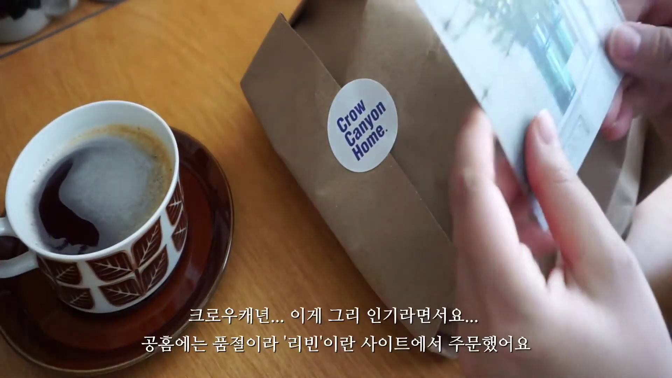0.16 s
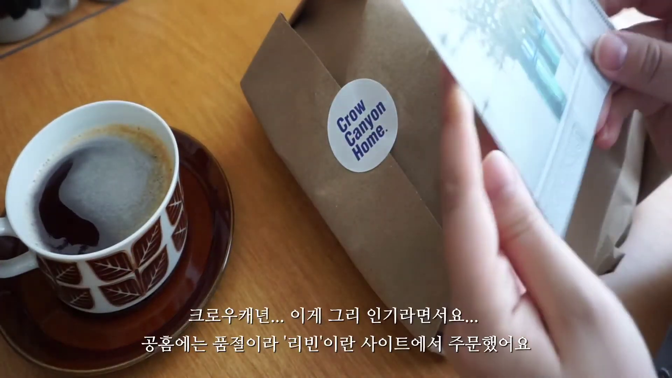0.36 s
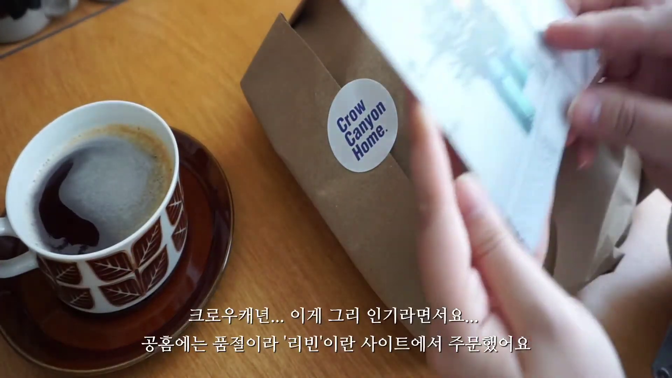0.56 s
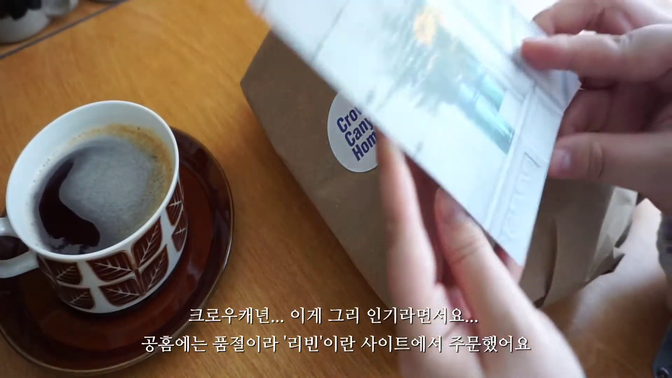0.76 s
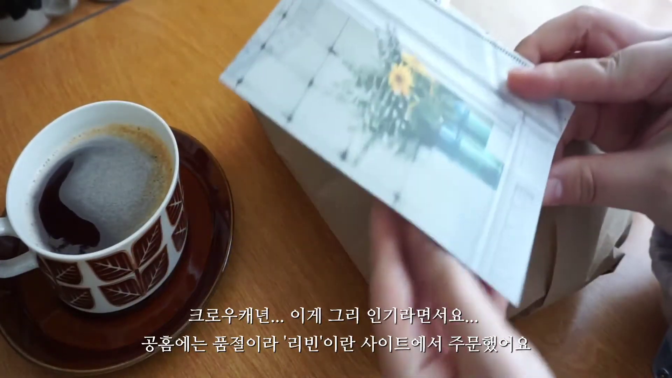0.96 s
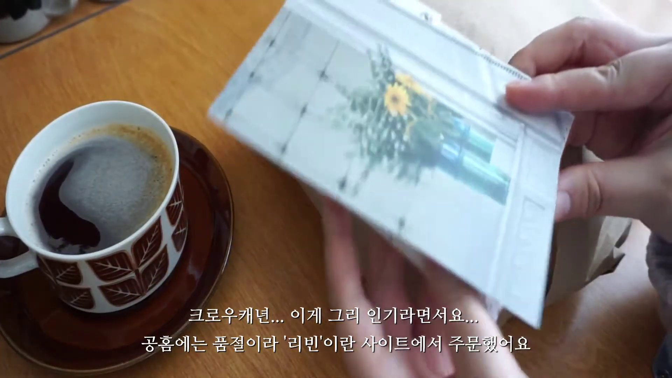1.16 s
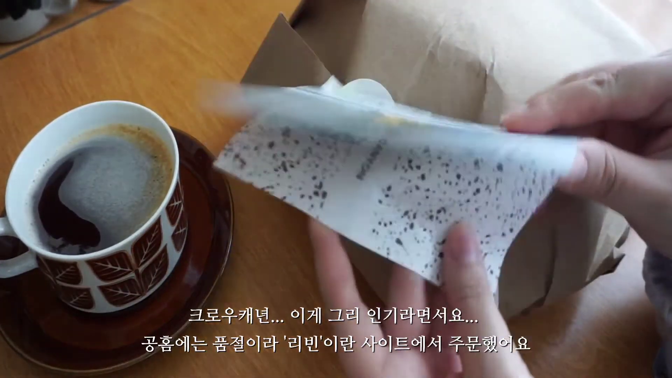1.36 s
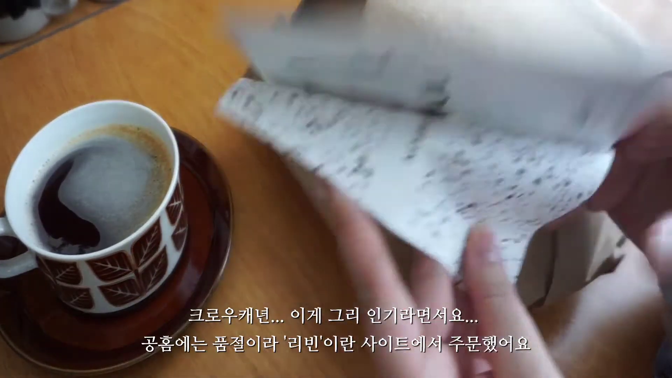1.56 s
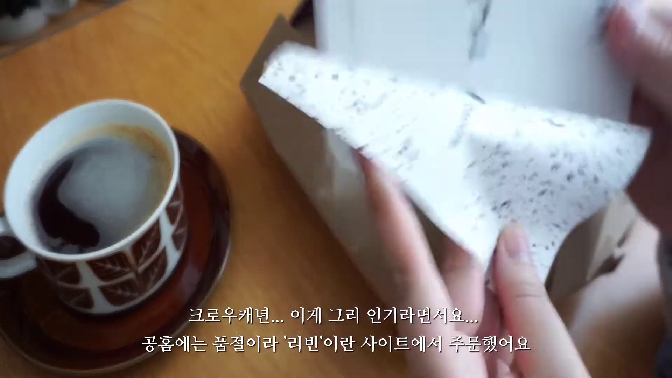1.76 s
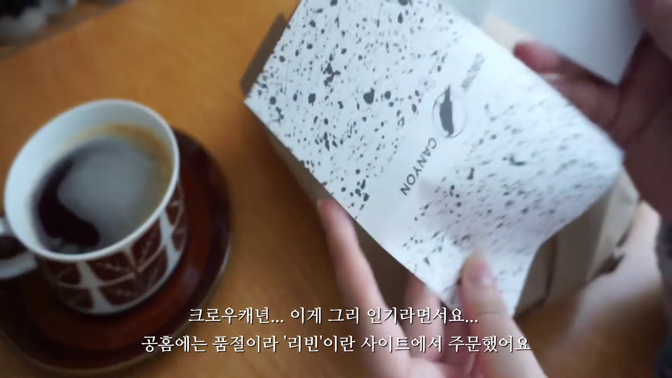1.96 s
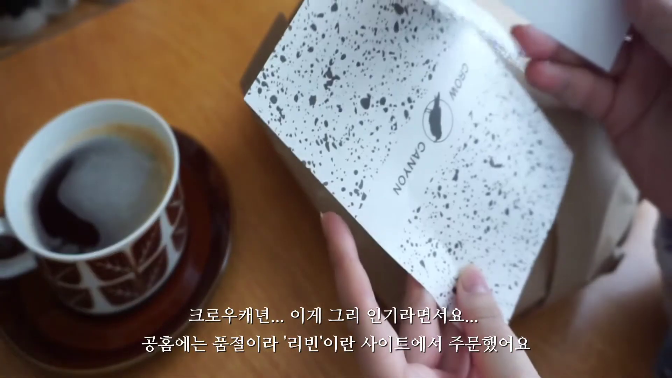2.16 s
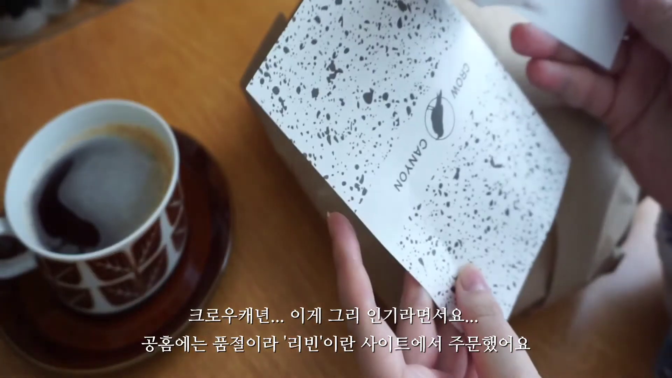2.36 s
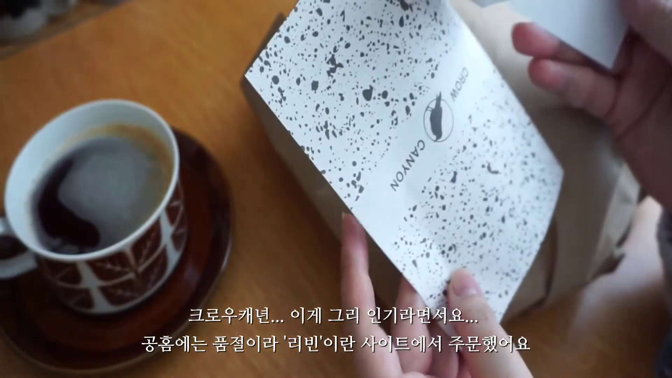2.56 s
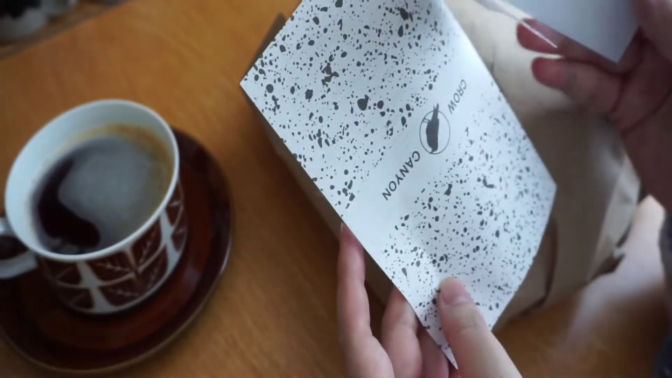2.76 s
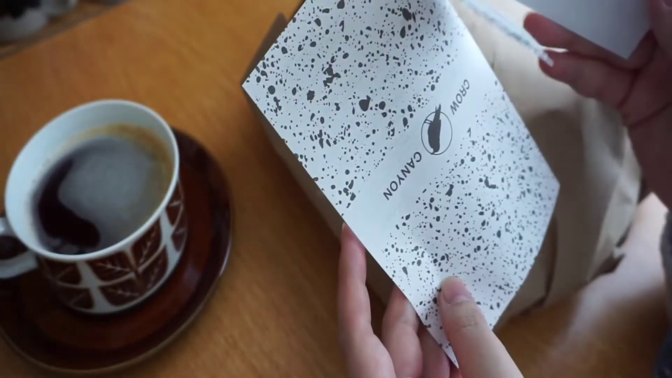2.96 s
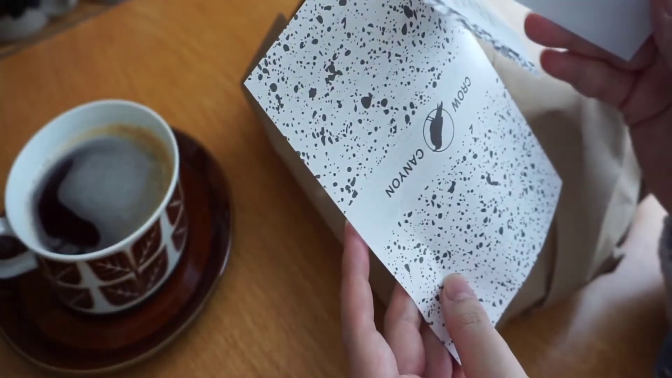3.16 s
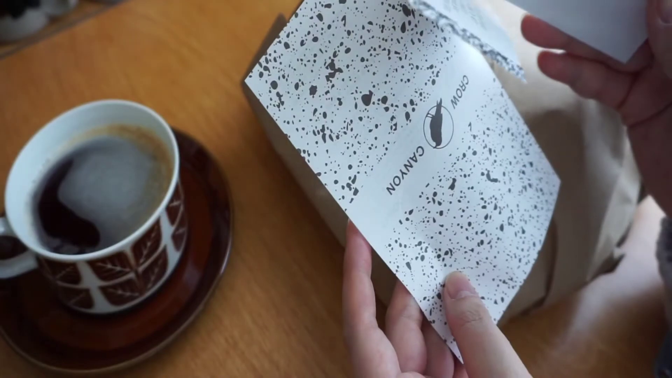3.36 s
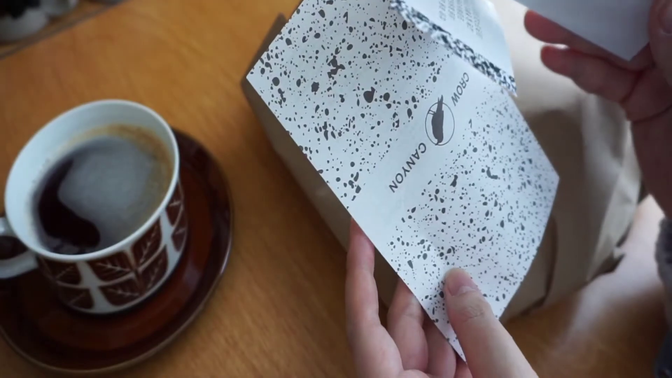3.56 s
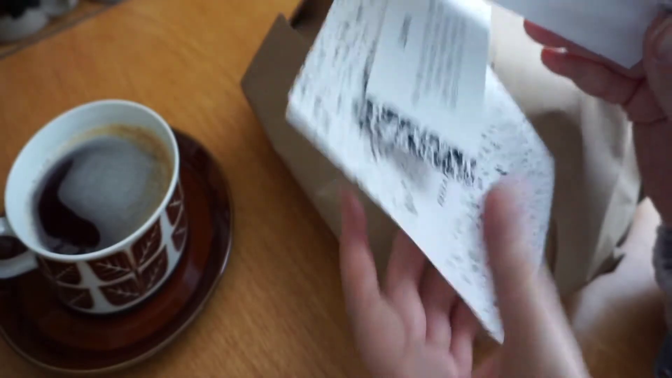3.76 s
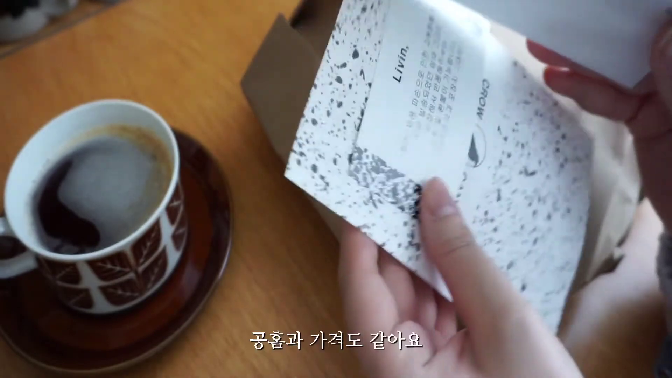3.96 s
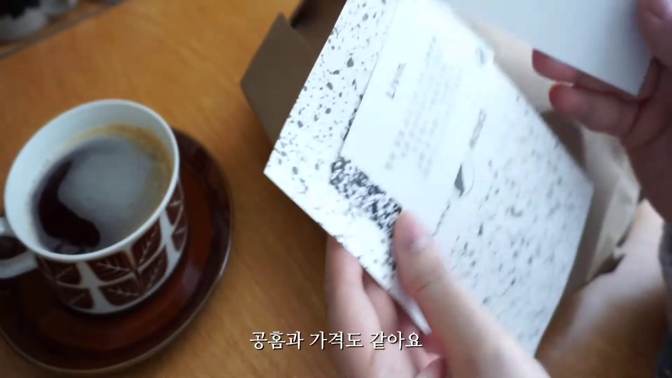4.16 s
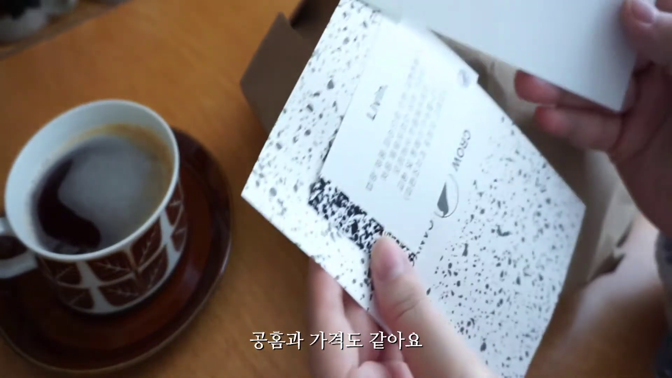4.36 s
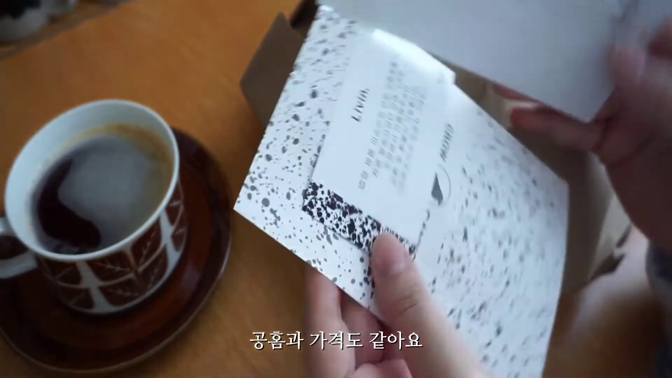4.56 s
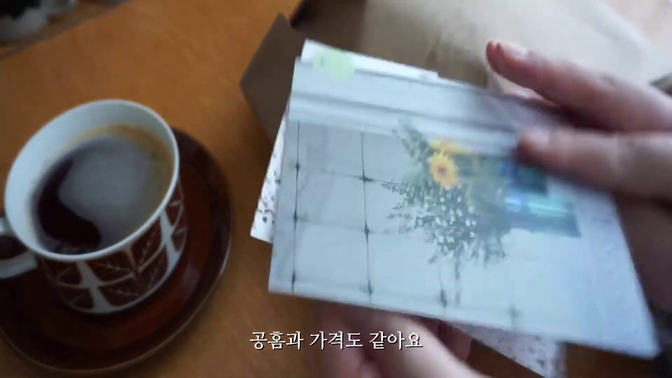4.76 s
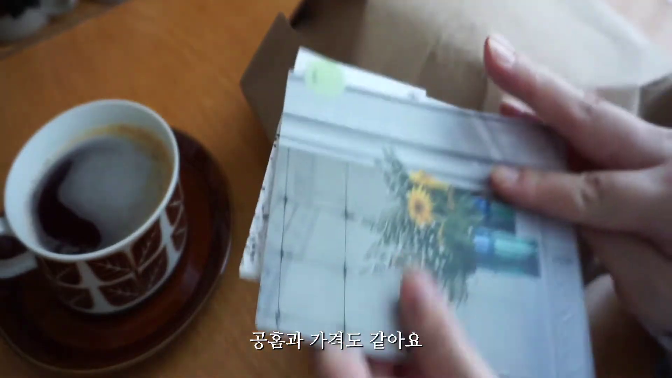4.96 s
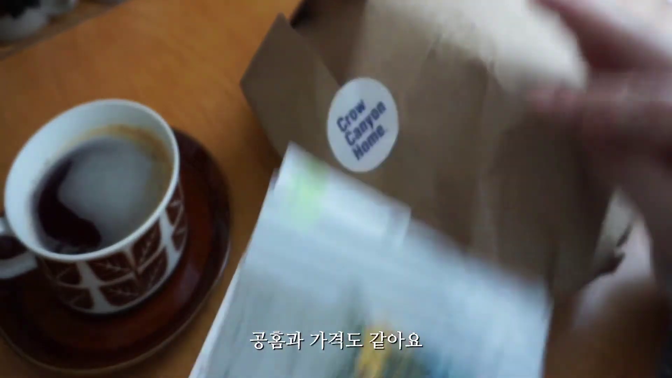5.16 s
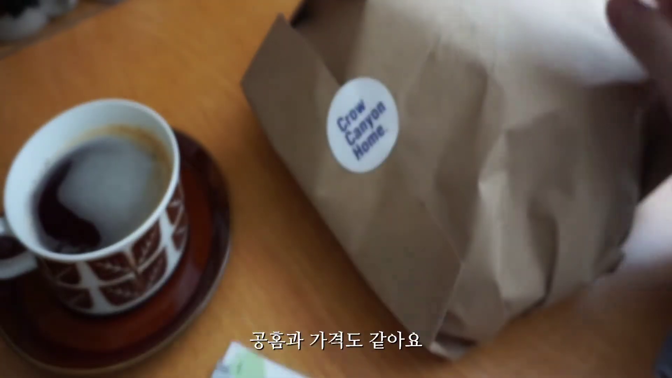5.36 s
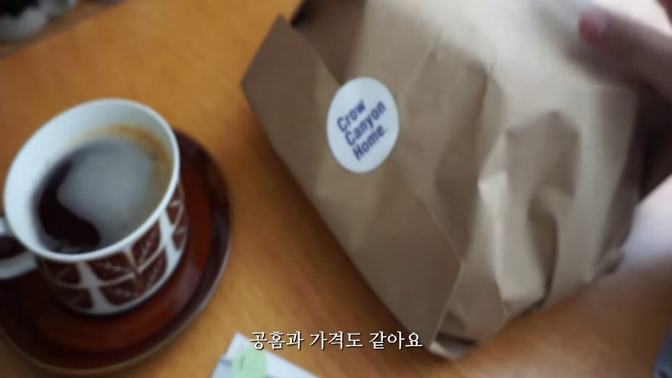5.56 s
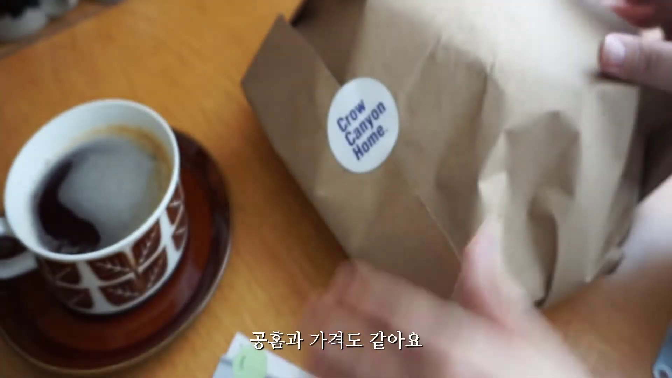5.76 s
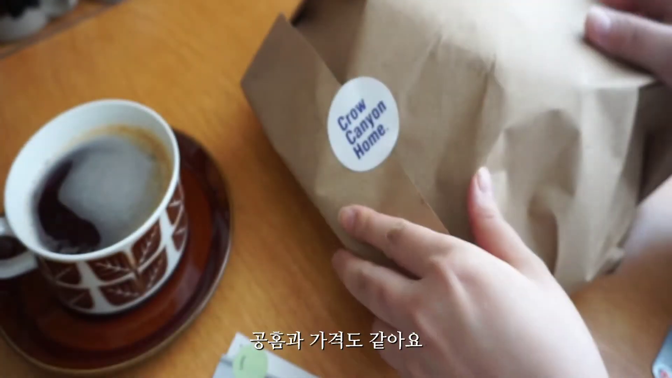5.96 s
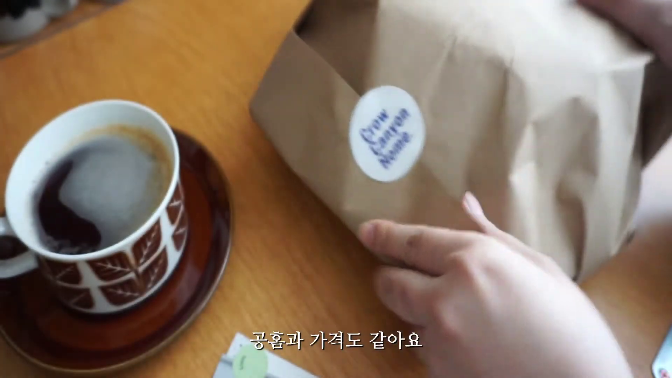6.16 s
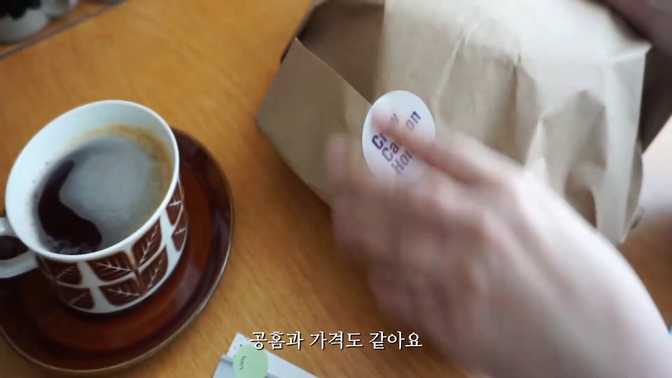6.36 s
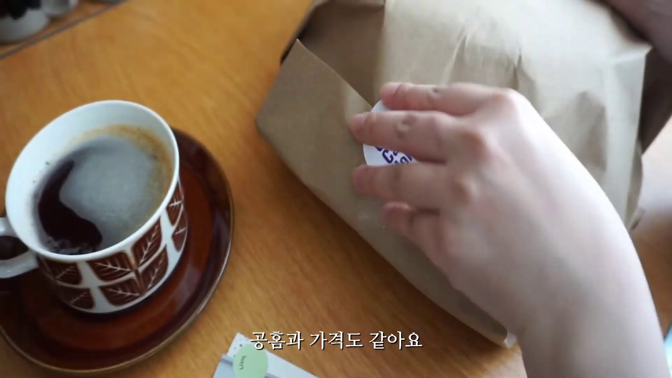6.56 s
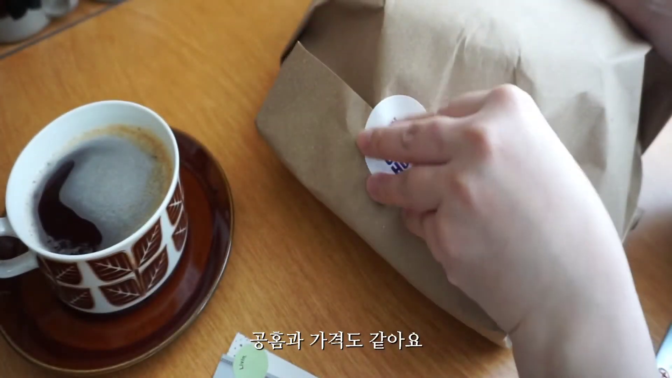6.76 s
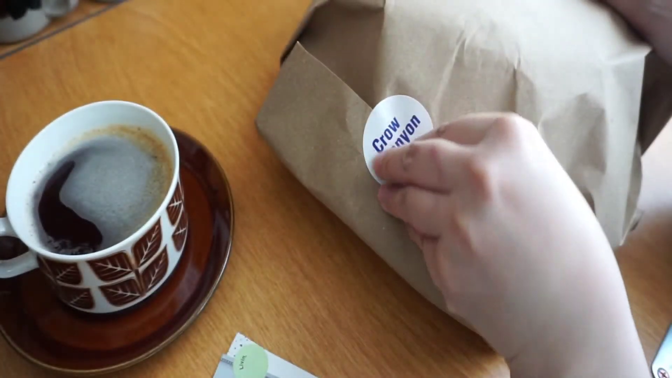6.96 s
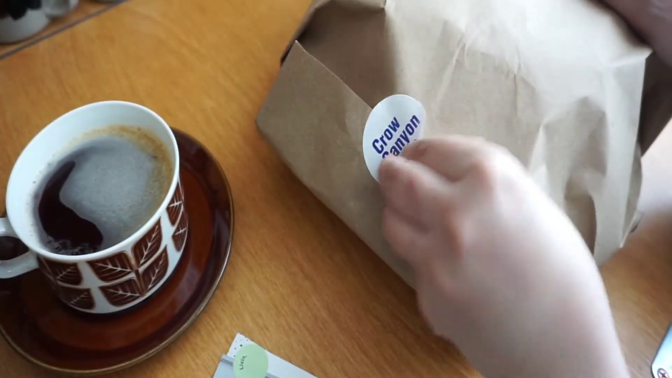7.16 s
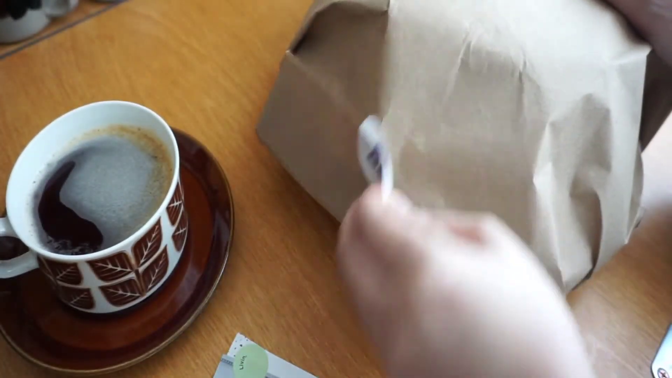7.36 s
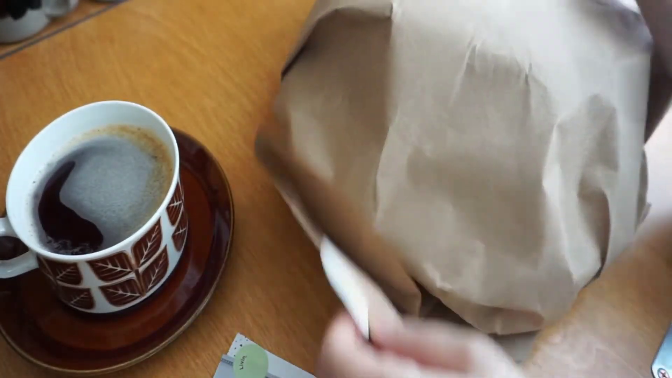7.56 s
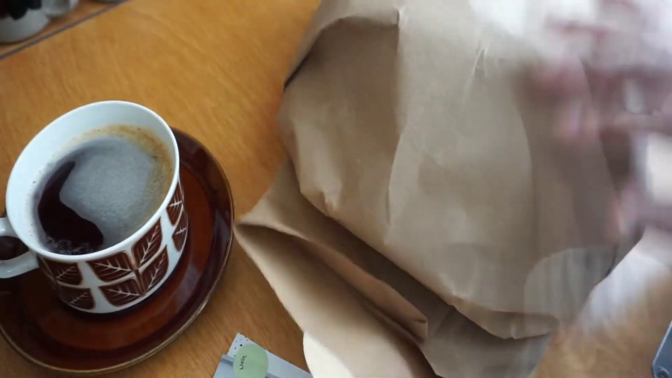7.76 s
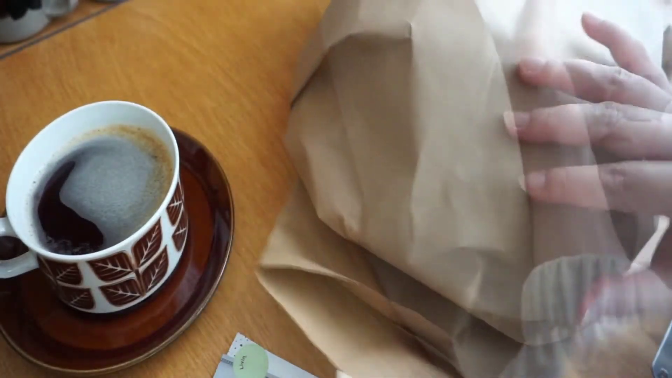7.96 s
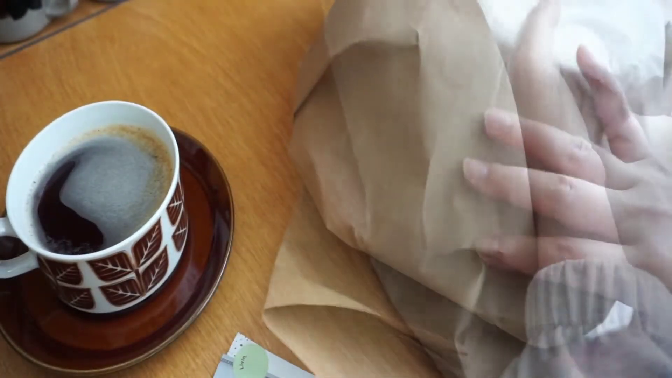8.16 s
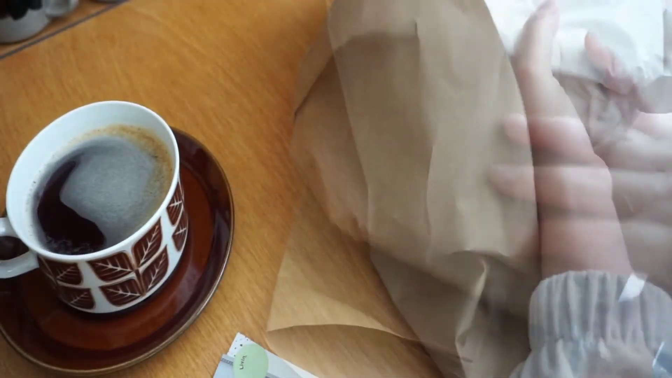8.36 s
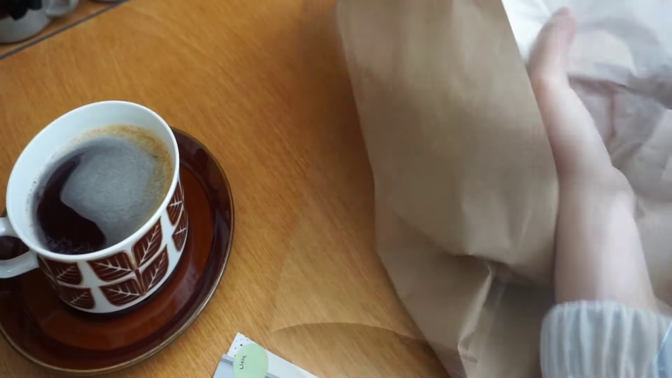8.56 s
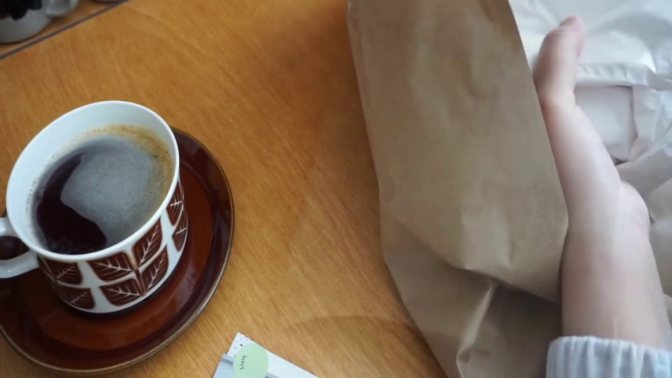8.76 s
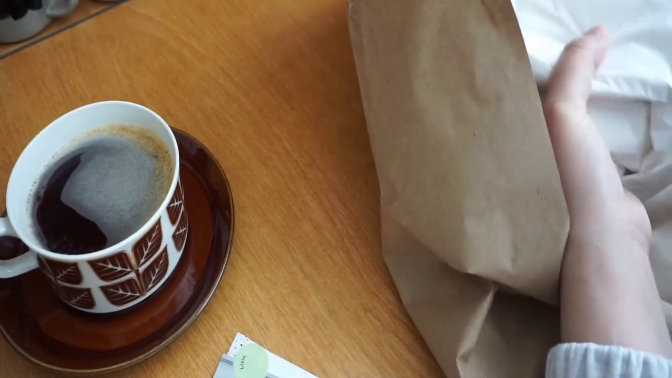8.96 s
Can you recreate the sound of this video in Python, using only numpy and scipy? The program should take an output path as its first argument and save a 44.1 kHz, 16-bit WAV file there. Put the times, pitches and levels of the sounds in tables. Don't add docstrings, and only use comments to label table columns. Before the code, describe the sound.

Thin cards and leaflets slide and snap lightly in a quiet room, then a stiff paper parcel crackles loudly with a hollow boom.

```python
import sys
import numpy as np
from scipy import signal
from scipy.io import wavfile
from scipy.ndimage import uniform_filter1d, map_coordinates

SR = 44100
rng = np.random.default_rng(int(sys.argv[2]) if len(sys.argv) > 2 else 0)


def ratio_of_db(decibels):
    return 10 ** (np.asarray(decibels, float) / 20)


def pcm_store(signal):
    levels = np.round(np.clip(np.atleast_2d(signal), -1, 1) * 32767)
    wavfile.write(sys.argv[1], SR, levels.astype(np.int16).T)


N = 396900


def evened(x):
    return x / np.sqrt(np.mean(x ** 2) + 1e-20)


def read(points, hz):
    f, value = np.transpose(points)
    return np.interp(np.log(hz + 1), np.log(f + 1), value)


def add(mix, s, sound):
    part = mix[round(s * SR):][:len(sound)]
    part += sound[:len(part)]


def band(x, lo_hz, hi_hz):
    return signal.sosfilt(signal.butter(2, [lo_hz, hi_hz], "band", fs=SR, output="sos"), x)


def resonate(x, hz, width_hz):
    turn = np.exp(2j * np.pi * np.cumsum(hz * np.ones(len(x))) / SR)
    r = np.exp(-np.pi * width_hz / SR)
    smooth = signal.lfilter([1 - r], [1, -r], x / turn + 1e-18)
    return 2 * (turn * smooth).real


# pitch_hz, level_db (per Hz)
ROOM_TONE = [(12, -56), (20, -49), (43, -2.5), (91, -12.5), (213, -11), (250, -5), (344, -17.5), (449, -12),
             (499, -16), (9050, -32), (11500, -36), (15000, -72), (22000, -120)]
# pitch_hz, likeness (1 = same)
ROOM_LIKENESS = [(60, 0.85), (170, 0.83), (500, -0.39), (1430, -1.05), (4100, -0.4), (11800, 0.2)]


def still_room():
    frames, hz = N // 512 + 5, np.fft.rfftfreq(2048, 1 / SR)
    a, b, c, d, patches = rng.standard_normal((frames, 1025, 5)).T
    patches = evened(uniform_filter1d(uniform_filter1d(patches, 16, 0), 8, 1))
    same = np.clip(read(ROOM_LIKENESS, hz), -1, 1)[:, None]
    left = a + 1j * b
    right = same * left + np.sqrt(1 - same ** 2) * (c + 1j * d)
    z = np.array([left, right]) * ratio_of_db(read(ROOM_TONE, hz)[:, None] + 1.8 * patches)
    tone = signal.istft(z, nperseg=2048, noverlap=1536)[1][:, :N]
    motor = ratio_of_db(-63) * evened(resonate(rng.standard_normal(N), hz=59.6, width_hz=5.4))
    return motor + ratio_of_db(-56) * evened(tone)


# pitch_hz, t60_s
WALLS = [(150, 0.23), (600, 0.26), (2000, 0.17), (6000, 0.2), (11000, 0.24)]


def echoes(x, start_s, t60_factor, change_s, size, count):
    taps = np.zeros((count, 2, size))
    at = np.arange(round(start_s * SR), size - 16, 16)
    at = at + rng.integers(0, 16, (count, 2, len(at)))
    np.put_along_axis(taps, at, rng.choice([-1., 1.], at.shape), 2)
    hz, t, z = signal.stft(taps, SR, nperseg=256)
    same = 1 / (1 + (hz[:, None] / 700) ** 2)
    z[:, 1] = same * z[:, 0] + np.sqrt(1 - same ** 2) * z[:, 1]
    t60 = t60_factor * read(WALLS, hz)[:, None]
    tails = signal.istft(z * ratio_of_db(-60 * t / t60), SR, nperseg=256)[1]
    tails = tails / np.linalg.norm(tails[0, 0])
    turn = (np.arange(N) / SR / change_s - np.arange(count)[:, None]) % count
    windows = np.sin(np.pi / 2 * np.minimum(turn, 2))
    wet = signal.oaconvolve(np.float32(x * windows)[:, None], np.float32(tails), axes=2)
    return wet.sum(axis=0)[:, :N]


# pitch_hz, width_hz, share
TABLE_BOUNCE = [(189, 80, -0.15), (327, 117, 0.24), (531, 150, -0.22)]


def off_table(paper):
    out = paper
    for hz, width, share in TABLE_BOUNCE:
        out = out + share * signal.lfilter(*signal.iirpeak(hz, hz / width, SR), paper)
    return out


# time_s, left_minus_right_db
HANDS = [(0.0, -9), (0.45, -5.5), (1.1, -0.5), (1.5, -1), (1.78, -6), (3.46, 0), (3.68, -7), (4.36, -4.5),
         (5.14, -5.5), (5.41, 0), (5.89, -8.5), (6.69, -1), (8.72, -6), (9.0, -3)]


def direct_sound(paper):
    treble = paper - signal.lfilter([.1], [1, -.9], paper)
    half_db = np.interp(np.arange(N) / SR, *np.transpose(HANDS)) / 2
    left = paper + (ratio_of_db(half_db) - 1) * treble
    right = paper + (ratio_of_db(-half_db) - 1) * treble
    wander = evened(uniform_filter1d(uniform_filter1d(rng.standard_normal(N), size=1500), size=1500))
    lag = 1.33 + 1.55 * wander
    return np.array([map_coordinates(left, [np.arange(N) - lag], order=3), right])


def bump(db, hz, t60, chance):
    t = np.arange(len(chance)) / SR
    swing = np.sin(2 * np.pi * hz * t * (1.04 - 3.76 * t)) + .5 * evened(band(chance, 69, 1340))
    return ratio_of_db(db + 1.0 - 60 * (t / t60) ** 1.5) * swing * (1 - np.exp(-t / 0.0018))


def add_bumps(mix, rows, t60, size):
    for s, db, hz in rows:
        add(mix, s, bump(db, hz, t60, rng.standard_normal(size)))


# start_s, level_db (peak), pitch_hz
THUDS = [(0.008, -35, 175), (1.612, -31.5, 138), (1.813, -37.5, 142), (1.883, -38, 169), (4.886, -35, 99),
         (5.297, -41, 118), (5.992, -38, 107), (6.676, -33, 152), (7.156, -33.5, 155), (7.4287, -27, 200),
         (8.218, -33, 148)]
# start_s, level_db (peak), pitch_hz
BOUNCES = [
    (.01, -37.5, 327),
    (0.06, -45, 130),
    (1.816, -36.5, 355),
    (1.831, -47, 150),
    (1.834, -54, 352),
    (1.854, -51, 200),
    (1.885, -36.5, 405),
    (1.907, -44, 170),
    (3.894, -38, 412),
    (5.734, -59, 350),
]


def add_table_knocks(paper):
    add_bumps(paper, THUDS, t60=0.07, size=6000)
    add_bumps(paper, BOUNCES, t60=0.043, size=3000)


# start_s, level_db (peak), pitch_hz
KNOCKS = [
    (1.615, -25, 592),
    (2.182, -33, 930),
    (3.79, -40.5, 450),
    (3.917, -32, 430),
    (3.996, -29.5, 944),
    (4.042, -28, 912),
    (4.888, -29.5, 930),
]
# start_s, level_db (peak), pitch_hz
PUSHES = [(5.968, -36, 387), (6.057, -29.5, 300), (6.148, -31, 352), (6.224, -31.5, 380),
          (6.314, -27.5, 367), (6.375, -22.5, 368), (6.589, -28.5, 314), (6.683, -19, 366),
          (6.681, -16.5, 755), (6.83, -31, 400), (7.012, -30, 338), (7.273, -25.5, 754),
          (7.425, -18.5, 300), (7.452, -20, 416), (7.682, -15.5, 367), (7.721, -25, 572), (7.824, -27, 730),
          (7.684, -23, 776), (7.952, -26, 453), (8.155, -22.5, 464), (8.228, -22.5, 368),
          (8.353, -23.5, 373), (8.453, -23, 369), (8.753, -25.5, 907), (8.903, -21.5, 287)]


def add_parcel_bumps(paper):
    add_bumps(paper, KNOCKS, t60=0.032, size=6000)
    add_bumps(paper, PUSHES, t60=0.035, size=6000)


# start_s, stop_s, level_db, gap_pitch_hz, fizz_db
SLIDES = [(0.889, 1.018, -43, 3000, -18), (1.013, 1.072, -39, 3120, -4), (1.061, 1.143, -51.5, 2960, -18),
          (1.36, 1.45, -46, 3200, 12), (1.47, 1.558, -33, 2580, 7), (1.772, 1.791, -39, 3120, 3.5),
          (2.778, 2.876, -64, 3200, 0), (5.004, 5.08, -46, 3550, -10), (5.06, 5.115, -34.5, 3480, -5),
          (0.691, 0.836, -63, 2230, -16), (1.257, 1.288, -50.5, 2900, 1), (5.121, 5.143, -37, 1470, -6),
          (5.086, 5.127, -38.5, 2470, -16), (5.924, 6.008, -50, 2350, -16), (0.938, 0.974, -45.5, 4900, -8),
          (6.205, 6.275, -46, 3320, 4)]


def slide(length_s, db, hz, fizz_db, chance):
    u = np.linspace(0, 1, round(length_s * SR))
    flutter, grain = chance[:, :len(u)]
    grain = grain * ratio_of_db(2.0 * evened(uniform_filter1d(flutter, size=180)))
    gap = evened(resonate(resonate(grain, hz, 1100), hz, 1100))
    gap = gap + 0.53 * evened(band(grain, 850, 6100))
    sound = evened(gap) + ratio_of_db(fizz_db) * evened(band(grain, 2740, 11400))
    return ratio_of_db(db) * sound * np.minimum(u / 0.19, 1) * np.minimum((1 - u) / 0.17, 1)


def add_slides(paper):
    for s, stop, db, hz, fizz_db in SLIDES:
        add(paper, s, slide(stop - s, db, hz, fizz_db, rng.standard_normal((2, 9000))))


# start_s, stop_s, level_db
PEELS = [
    (7.298, 7.37, -27.5),
    (7.381, 7.438, -26),
]


def peel(length_s, db, chance):
    u = np.linspace(0, 1, round(length_s * SR))
    clump, grain = chance[:, :len(u)]
    grain = grain * abs(grain) ** .9 * ratio_of_db(3.9 * evened(uniform_filter1d(clump, size=120)))
    sound = evened(band(grain, 2200, 7100)) + 1.3 * evened(band(grain, 5200, 10400))
    return ratio_of_db(db) * evened(sound) * np.minimum(u / 0.08, 1) * np.minimum((1 - u) / 0.22, 1)


def add_peels(paper):
    for s, stop, db in PEELS:
        add(paper, s, peel(stop - s, db, rng.standard_normal((2, 4000))))


# start_s, level_db (peak), pitch_hz, t60_s
LEAFLET_TICKS = [(.416, -42, 1410, 0.015), (.5761, -40, 1930, 0.0063), (.6265, -45, 1490, .02),
                 (2.184, -32, 2080, 0.0086), (.7891, -42, 2330, 0.011), (.8155, -48, 2170, .015),
                 (.873, -41, 6800, .01), (1.0231, -32, 2790, 0.011), (1.0355, -38.5, 3130, .012),
                 (1.1388, -32, 2600, 0.0091), (1.3583, -27, 4300, 0.012), (1.3773, -30, 4970, .01),
                 (1.3857, -31, 2010, .012), (1.4257, -23, 3100, .012), (1.4775, -17.5, 4260, 0.011),
                 (1.491, -18.5, 2500, 0.018), (1.925, -35, 2940, 0.022), (2.1775, -29.5, 2950, 0.013),
                 (3.79, -24, 3000, 0.02), (3.8855, -34, 5230, 0.0091), (3.892, -31, 2600, .025),
                 (3.9195, -27, 2540, 0.044), (4.001, -31, 1010, 0.017), (4.024, -27, 1900, 0.008),
                 (4.039, -25.5, 960, 0.016), (4.657, -44, 750, 0.018), (5.13, -43, 1300, .015),
                 (5.3755, -25.5, 960, 0.043), (5.376, -28.5, 1810, 0.05), (5.4665, -23.5, 3100, .003)]
# start_s, level_db (peak), pitch_hz, t60_s
PARCEL_TICKS = [(5.9968, -17.5, 2340, 0.0056), (6.066, -25, 1040, 0.018), (6.293, -21.5, 870, .015),
                (6.378, -14, 1990, 0.017), (6.41, -25.5, 890, 0.048), (6.834, -34, 1110, 0.0058),
                (6.9011, -44, 3430, .01), (6.938, -33, 2480, 0.01), (7.0438, -25, 694, 0.011),
                (7.203, -16, 2860, 0.0079), (7.2984, -16, 4400, 0.0052), (7.3067, -17, 4720, 0.0049),
                (7.314, -18, 3180, .005), (7.3228, -11, 2920, 0.0026), (7.3371, -9, 2650, 0.0032),
                (7.34, -24, 5000, .004), (7.3935, -17, 3520, .004), (7.403, -11, 6200, 0.0029),
                (7.4063, -11, 4860, 0.0037), (7.4208, -5, 2470, 0.0031), (7.4275, -16, 2190, 0.0053),
                (7.669, -24, 3600, 0.0091), (7.792, -17.5, 1290, 0.01), (7.828, -20.5, 1020, 0.016),
                (7.834, -17, 2520, 0.017), (8.1548, -27, 2020, .01), (8.1962, -27, 2200, .01),
                (8.3522, -19, 2080, 0.014), (7.472, -14.5, 900, 0.0096), (8.642, -14, 2190, 0.0066),
                (8.767, -13.5, 1990, 0.014), (8.777, -19, 1500, 0.011), (8.815, -14, 6040, .006),
                (8.8597, -16.5, 2020, .01), (8.906, -19, 880, 0.01), (8.9183, -17, 1840, 0.011),
                (8.93, -14, 695, 0.0096), (8.99, -19, 1180, 0.013)]


def tick(db, hz, t60, chance):
    t = np.arange(len(chance)) / SR
    grit = band(chance * ratio_of_db(-60 * t / 0.0037), 650, 14400)
    rough = 1 + uniform_filter1d(chance, size=8)
    ring = ratio_of_db(-60 * t / t60) * np.sin(2 * np.pi * hz * t) * rough
    sound = ring + 0.24 * grit / abs(grit).max()
    return ratio_of_db(db) * sound / abs(sound).max()


def add_ticks(paper):
    for s, db, hz, t60 in LEAFLET_TICKS + PARCEL_TICKS:
        add(paper, s, tick(db, hz, t60, rng.standard_normal(2000)))


def snap(db, hz, dull_db, bright_db, t60, chance, click):
    t = np.arange(len(chance)) / SR
    shock = chance * abs(chance) ** 0.33 * ratio_of_db(-60 * (t / t60) ** 1.5) * (1 - np.exp(-t / 0.0006))
    shock[28:35] += click * np.array([0.3, 0.8, 0.7, 0.1, -0.4, -0.5, -0.2])
    ring = evened(band(shock, 800, 5000)) + 1.2 * evened(resonate(shock, hz, 500))
    bright = band(shock * ratio_of_db(-60 * t / 0.028), 3500, 13100)
    sound = evened(ring) + ratio_of_db(bright_db + 5.5) * evened(bright)
    sound /= abs(sound).max()
    dull = band(shock, 235, 846)
    return ratio_of_db(db + 2) * (sound + ratio_of_db(dull_db) * dull / abs(dull).max())


def add_creases(paper, rows, t60, click):
    for s, db, hz, dull_db, bright_db in rows:
        shorter = 1 - 0.01 * (db + 18.5)
        chance = rng.standard_normal(2600)
        add(paper, s, snap(db, hz, dull_db, bright_db, t60 * shorter, chance, click))


# start_s, level_db (peak), pitch_hz, dull_db, bright_db
LEAFLET_SNAPS = [(.4117, -24.5, 1050, -31, -8.5), (2.164, -33.5, 4500, -29, -1),
                 (.8537, -30.5, 2080, -10.5, -7), (1.6118, -5, 3040, -25, -7.5),
                 (1.9584, -32, 3670, -34, -12), (2.127, -35.5, 2080, -42, -8),
                 (2.1745, -20, 2310, -17, -41), (2.7598, -47, 926, 0, -20), (3.7075, -42, 937, -31, -7),
                 (3.7888, -14, 2600, -21, -8.5), (3.8829, -27.5, 2400, -9.5, -10),
                 (4.981, -30, 3460, -33, -14), (5.2973, -22, 4750, -39, -13),
                 (5.3735, -21.5, 1090, -13.5, -10), (5.7296, -35, 1580, -4, -18)]
# start_s, level_db (peak), pitch_hz, dull_db, bright_db
PARCEL_SNAPS = [(5.999, -22.5, 2170, -3, -22), (6.1926, -25, 2370, -15, -13), (6.282, -29, 2160, -2.5, 9),
                (6.5882, -50, 1030, -46, -27.5), (6.6823, -10.5, 890, -29, -16),
                (6.803, -20, 2560, -26, -4), (7.122, -27.5, 1040, -10, 15), (7.1611, -40.5, 1025, 8, -9),
                (7.3316, -12, 920, -14.5, -3), (7.41, -11.5, 2170, -14, -23), (7.4642, -10, 2420, -22, -8),
                (7.535, -17.5, 2590, -25, -7), (7.5823, -29.5, 1190, -1, -17),
                (7.7212, -17, 2240, -10.5, -26), (7.797, -18.5, 1240, -21, -40),
                (7.8232, -19, 2350, -22, -34), (8.2276, -11, 1120, -10, -18), (8.2369, -8, 1080, -21, -6),
                (8.5768, -11.5, 1970, -42, -26), (8.629, -18.5, 2100, -29, -16),
                (8.684, -12.5, 2000, -31, -25), (8.7557, -18, 920, -5, -36), (8.8827, -13.5, 3220, -9, -10)]


def add_snaps(paper):
    add_creases(paper, LEAFLET_SNAPS, t60=0.026, click=3.7)
    add_creases(paper, PARCEL_SNAPS, t60=0.041, click=3.7)


# start_s, level_db (peak), pitch_hz, dull_db, bright_db
LEAFLET_POPS = [(.9128, -12.5, 2930, -23.5, -11), (1.4548, -23, 3550, -34, -18),
                (1.7629, -18.5, 2880, -22, -14), (1.817, -23.5, 3940, -23, -9),
                (1.8817, -28, 2950, -16.5, -16), (3.9174, -12.5, 1880, -32, -8.5),
                (3.9412, -22, 3770, -41, -11), (3.9505, -18.5, 2220, -51, -11),
                (3.9914, -23, 1900, -13, -9), (4.0443, -9, 1650, -26, -17),
                (4.8887, -12.5, 2270, -16.5, -10), (4.9512, -18.5, 2190, -56, -48),
                (5.466, -15.5, 1800, -39, -9)]
# start_s, level_db (peak), pitch_hz, dull_db, bright_db
PARCEL_POPS = [(6.0584, -12, 1380, -7.5, -38), (6.3715, -2, 2580, -54, -9), (6.6527, -2, 1430, -20.5, -8.5),
               (7.0124, -18, 1880, -13, -30), (7.203, -7, 2400, -19, -15), (7.2761, -5, 970, -20, -15),
               (7.3812, -6.5, 2650, -15, -8), (7.4577, -8.5, 3100, -7, -31), (7.986, -6, 1500, -17, -38),
               (8.063, -9, 1990, -14, -45), (8.133, -15, 1400, -10, -16), (8.2676, -6, 1250, -51, -44),
               (8.334, -12.5, 2550, -40, -25), (8.541, -5.5, 2480, -25, -8), (8.638, -11, 2200, -11.5, -23),
               (8.812, -8, 1820, -16, -4)]


def add_pops(paper):
    add_creases(paper, LEAFLET_POPS, t60=0.038, click=13)
    add_creases(paper, PARCEL_POPS, t60=0.028, click=13)


def slips(per_s, spread_db, clump_db, clump_s):
    size = ratio_of_db(spread_db * np.minimum(rng.exponential(1, N), 4))
    size = size * np.sign(rng.standard_normal(N))
    span = max(round(clump_s * SR), 2)
    clumps = evened(uniform_filter1d(uniform_filter1d(rng.standard_normal(N), span), span))
    return size * (rng.random(N) < per_s / SR) * ratio_of_db(clump_db * clumps)


def crackle(per_s):
    t, out = np.arange(700) / SR, np.zeros(N)
    clicks = slips(per_s, spread_db=1.5, clump_db=3.0, clump_s=0.083)
    kind = rng.integers(0, 9, N)
    for k, hz in enumerate(np.geomspace(350, 6000, 9)):
        rattle = rng.standard_normal(700) * ratio_of_db(-60 * t / 0.0044)
        rattle = evened(rattle) + 3.5 * evened(resonate(rattle, hz, 0.5 * hz))
        out += signal.oaconvolve(clicks * (kind == k), rattle)[:N]
    return evened(out)


def strokes(rows, hollow_db, scrape_hz):
    s, swell_s, fade_s, db, skim_db = np.transpose(rows)[:, :, None]
    late = np.arange(0, N + 200, 100) / SR - s
    swell, fade = -late / np.clip(swell_s, .01, 1), late / np.clip(fade_s, .01, 1.5)
    below_db = 20 * np.where(late < 0, swell, fade)
    scrape = ratio_of_db(2 * (db - below_db))
    fizz = scrape * ratio_of_db(2 * skim_db)
    hollow = ratio_of_db(2 * (db + hollow_db - 0.39 * skim_db - below_db / 1.03))
    pitch_hz = scrape_hz + 114 * skim_db
    return np.sum([scrape, fizz, hollow, scrape * pitch_hz], axis=1)


# peak_s, swell_s and fade_s (by 20 dB), scrape_db, skim_db (light touch fizzes more)
LEAFLET_STROKES = [(0, 2, 0.27, -44, -0.5), (.15, 0, 0.5, -52.5, -2.5), (.33, 1.5, 0.6, -61.5, 8),
                   (.465, -0.9, 0.6, -59, 0.5), (.57, 0.04, 0.05, -56, 4), (.635, .05, 0.03, -53.5, -5),
                   (.8, 2.2, 24, -66.5, -27), (.87, -3, 0.43, -48, 1.5), (.93, 0.3, .5, -51, -10),
                   (1.0, 0.5, 1, -64, 2), (1.145, 0.2, 0.07, -47.5, -1), (1.3, 0, 0.1, -54.5, 7.5),
                   (1.43, 0.14, 0.37, -37, -0.5), (1.545, -0.3, -0.9, -44, 1), (1.645, 0, 0.48, -42, -3.5),
                   (1.735, -0.8, 0.32, -45, 0), (1.78, -2.5, 0.45, -63, -5), (1.92, -0.5, -0.01, -40, -6),
                   (2.14, 0, 0.5, -56.5, -10.5), (2.85, .4, 0.17, -58.5, -9), (3.71, -0.43, 0.4, -57, 7),
                   (4.03, 0.5, .5, -51, -12.5), (4.28, 1.5, 0.05, -65, 6), (4.72, -4.5, -2, -75, -3),
                   (4.84, 0.27, 1.4, -53, 3.5), (4.98, 0.24, 0.23, -46.5, -12), (5.16, -1, 0, -41, -5),
                   (5.27, 12, 2.1, -53.5, -22), (5.34, -0.04, -0.4, -49.5, 8), (5.5, -1.5, 1, -61, -1),
                   (5.685, 0, 0, -50.5, 1), (5.74, -5, 3, -60, 0), (5.95, 0.27, 1, -46.5, 3)]
# peak_s, swell_s and fade_s (by 20 dB), scrape_db, skim_db
PARCEL_STROKES = [(6.02, -0.18, 0, -34.5, -1), (6.15, -0.3, 0, -50, -1), (6.28, .5, 0.5, -36.5, -2.5),
                  (6.42, -0.44, 0.25, -45, -10), (6.5, 0.8, 0.5, -47, -3), (6.56, -2, .6, -47, -1.5),
                  (6.63, 0, 0.16, -42, 1.5), (6.7, 0.08, 0.15, -36, -12), (6.82, -8, -1, -49.5, -9),
                  (6.95, -0.8, -0.8, -48.5, 1), (7.03, 0.7, 0.5, -49, -15), (7.125, -0.1, -0.16, -44, 5),
                  (7.21, -0.3, 0.1, -40.5, 0), (7.38, 0.25, 0, -36, -12.5), (7.57, 0.7, 0.5, -43, -18),
                  (7.66, 2, 1, -42, -2.5), (7.745, 0.07, -0.1, -36.5, -1), (7.85, 0.5, -0.26, -38, -0.5),
                  (7.89, 0.3, -1.3, -38, -5.5), (7.97, 1, -1, -47, -16), (8.03, -0.7, .4, -39.5, -5.5),
                  (8.19, .5, 0.9, -34.5, -3.5), (8.4, 5, 3, -37.5, -7), (8.53, 0.13, 0.1, -36, 2.5),
                  (8.61, 0, 0.5, -40, 1), (8.66, 0.26, 0.25, -32, -10), (8.765, 0.13, 0.4, -29, -4),
                  (8.87, -2.3, 7, -39.5, -3), (8.92, 0.1, 0.7, -34.5, -11.5), (9, 0, 12, -32.5, 1)]


def handling():
    leaflet_hz = 2600
    rest = ratio_of_db(2 * np.array([-71, -77, -67]))
    total = strokes(LEAFLET_STROKES, hollow_db=-7.5, scrape_hz=leaflet_hz)
    total = total + strokes(PARCEL_STROKES, hollow_db=-4, scrape_hz=2940)
    total = total + np.append(rest, rest[0] * leaflet_hz)[:, None]
    rows = [*(10 * np.log10(total[:3])), total[3] / total[0]]
    return [np.interp(np.arange(N) / 100, np.arange(len(row)), row) for row in rows]


# pitch_hz, width_hz, level_db
PARCEL_BODY = [(140.3, 34, 2), (369, 9, -8), (704, 490, 0)]


def rubbing():
    scrape_db, fizz_db, parcel_db, hz = handling()
    crumpled = 1 / (1 + ratio_of_db(-44.0 - parcel_db))
    fine = evened(slips(per_s=9000, spread_db=2.5, clump_db=.7 + 1.3 * crumpled, clump_s=.012))
    fine = fine + 0.44 * crumpled * crackle(per_s=260)

    dull = evened(band(band(fine, 930, 3900), 680, 4200))
    whistle = (1.1 - 0.27 * crumpled) / (1 + ratio_of_db(-54.5 - scrape_db))
    scrape = (1 - 0.21 * crumpled) * evened(band(fine, 1340, 5050)) + 0.32 * crumpled * dull
    scrape = scrape + whistle * evened(resonate(fine, hz, 1800))
    fizz = band(fine, 3100, 11150)

    flex = slips(per_s=1500, spread_db=2, clump_db=2.0 + 2.2 * crumpled, clump_s=0.014) + 0.26 * fine
    hollow = sum(ratio_of_db(db) * evened(resonate(flex, f, w)) for f, w, db in PARCEL_BODY)
    boom = 0.38 * evened(hollow) + 0.09 * evened(band(flex, 29, 170))
    parcel = evened(band(flex, 120, 1650)) + crumpled * boom
    sound = ratio_of_db(scrape_db) * evened(scrape) + ratio_of_db(fizz_db) * evened(fizz)
    return sound + ratio_of_db(parcel_db) * evened(parcel)


def scene():
    paper = rubbing()
    for add_layer in (add_snaps, add_pops, add_parcel_bumps, add_table_knocks, add_slides, add_ticks, add_peels):
        add_layer(paper)
    paper = off_table(paper)
    near = echoes(paper, start_s=0.000991, t60_factor=0.17, change_s=.05, size=3000, count=7)
    walls = echoes(paper, start_s=.008, t60_factor=1.1, change_s=.12, size=14000, count=3)
    return ratio_of_db(0.5) * direct_sound(paper) + ratio_of_db(-4.5) * near + ratio_of_db(-8.0) * walls + still_room()


def roll_off(x):
    return signal.sosfilt(signal.butter(12, 12380, fs=SR, output="sos"), x)


def record(dry):
    knee = .9
    dry = knee * np.tanh(dry / knee)
    edge = signal.firwin(801, 11150, window=("kaiser", 9), fs=SR)
    limited = signal.oaconvolve(dry, edge[None], "same")
    soften = signal.firwin(25, 9500, window=("kaiser", 5), fs=SR)
    spill = np.array([np.convolve(side, soften, "same") for side in dry - limited])
    power = uniform_filter1d((spill ** 2).mean(axis=0), size=128)
    sharp = 1. * (power > 4.5 * uniform_filter1d(power, size=2048))
    sharp = uniform_filter1d(sharp, size=256)
    return roll_off(limited + ratio_of_db(14.5) * sharp * spill)


dry = scene()
out = record(dry)
pcm_store(out)
```